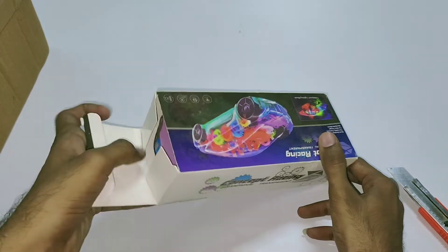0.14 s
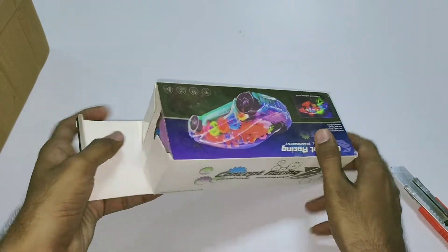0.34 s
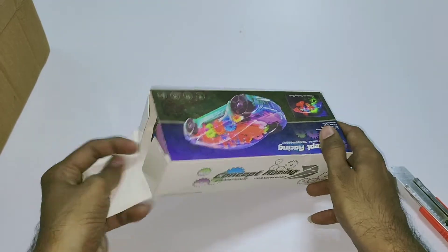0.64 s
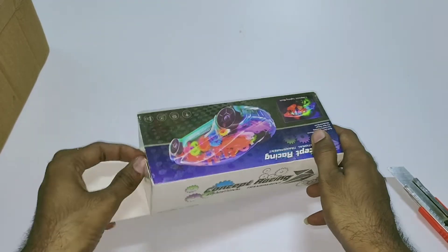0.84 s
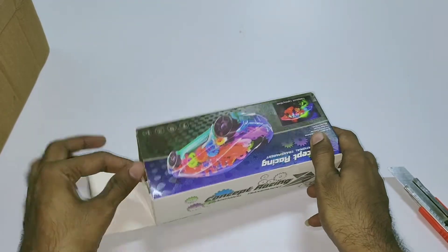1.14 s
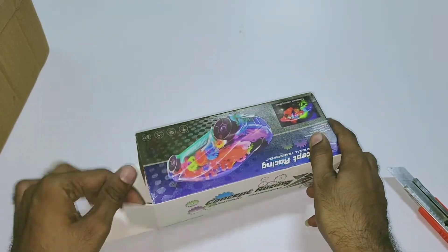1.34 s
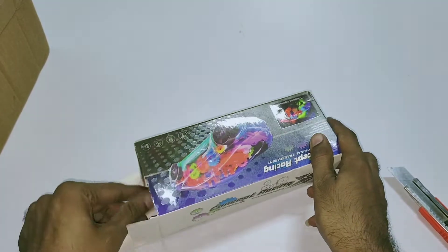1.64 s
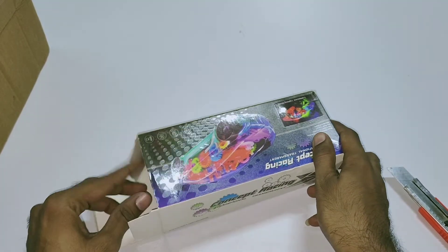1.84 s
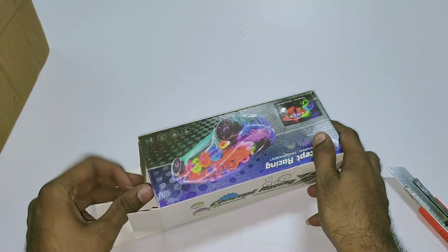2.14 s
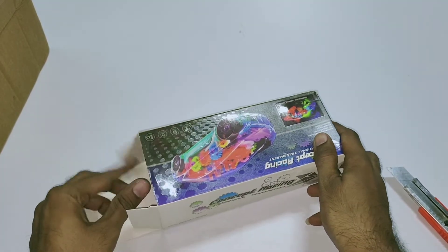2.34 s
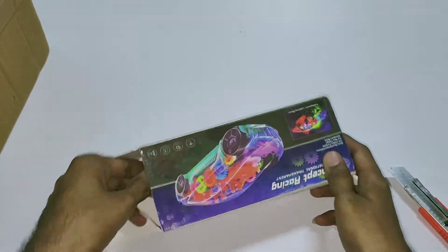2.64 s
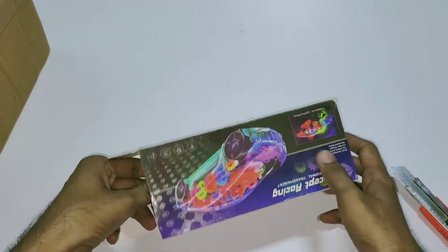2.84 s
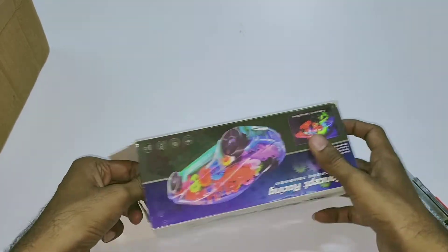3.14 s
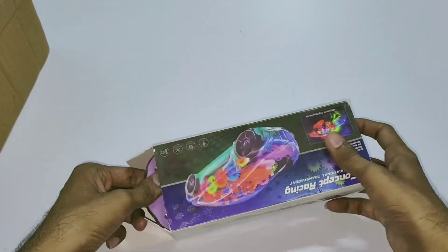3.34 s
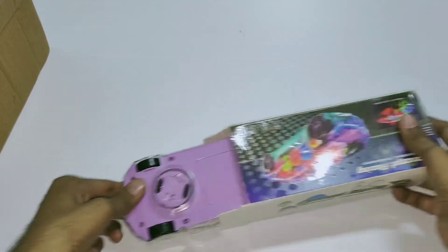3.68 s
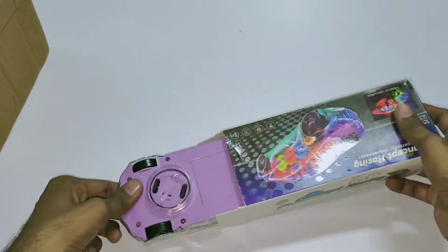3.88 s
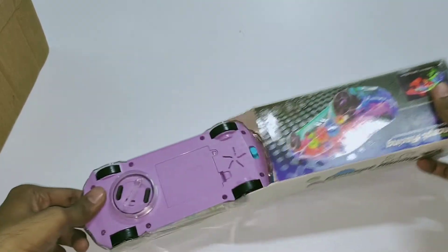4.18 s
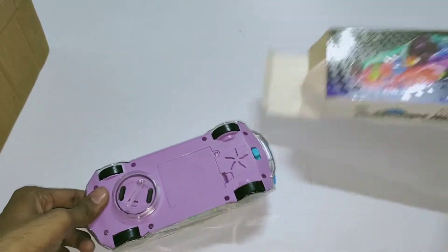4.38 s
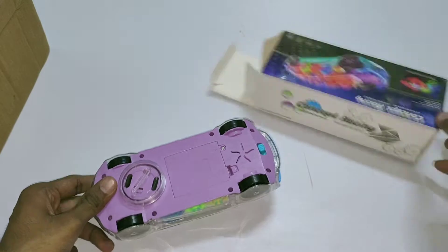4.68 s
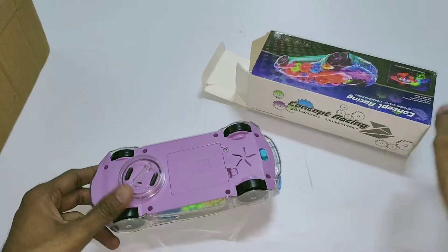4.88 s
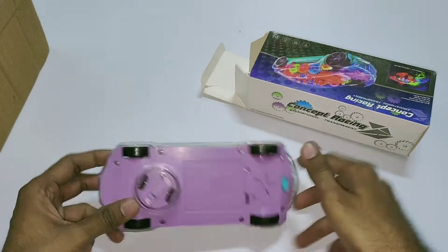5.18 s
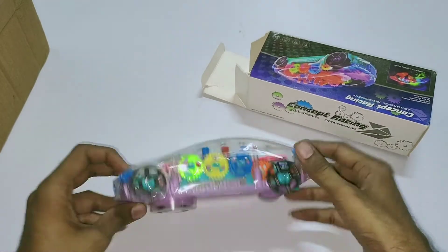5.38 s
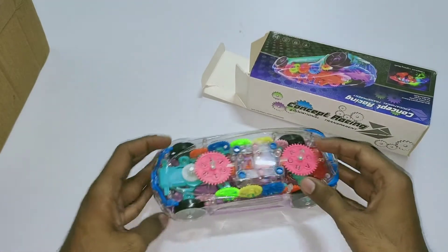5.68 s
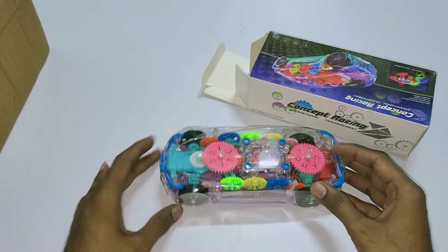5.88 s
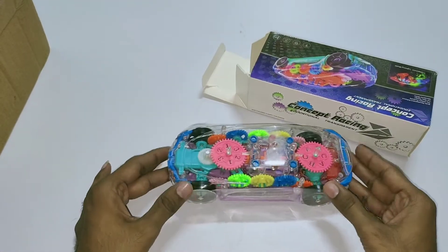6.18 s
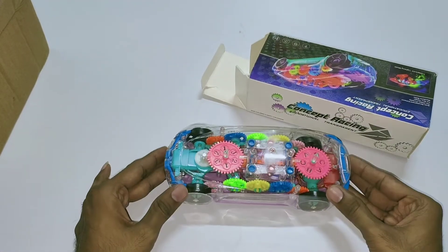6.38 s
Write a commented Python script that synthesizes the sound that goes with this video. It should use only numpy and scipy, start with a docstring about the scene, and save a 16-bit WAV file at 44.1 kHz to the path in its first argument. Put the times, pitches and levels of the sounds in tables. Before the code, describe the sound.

Close, dry card knocks and scuffs, a burst of plastic clicks, one hard box thud, then light toy handling in a live room.

```python
"""Two hands tap and rub a cardboard box on a table, lift it, slide a plastic toy car out, drop the box
and at last turn the car over, with short squeaks and faint thin whistling tones.
Force pulses and tiny slips ring the card and the plastic. The table rumbles, shakes and thumps, and a low
hum comes and goes: squeaks and hum are gliding sine tones, thumps are decaying sines of fixed pitch.
A small, fairly live room with a faint hiss, heard by two close microphone ports."""
import sys
import numpy as np
from scipy import signal
from scipy.fft import rfft, irfft
from scipy.io import wavfile
from scipy.ndimage import uniform_filter1d

SR = 44100
rng = np.random.default_rng(int(sys.argv[2]) if len(sys.argv) > 2 else 0)


def pcm_store(signal):
    """Save signal as 16-bit PCM."""
    levels = np.round(np.clip(np.atleast_2d(signal), -1, 1) * 32767)
    wavfile.write(sys.argv[1], SR, levels.astype(np.int16).T)


N = 287532
TIME = np.arange(N) / SR

# Taps, each with a low knock, a middle clack and a high tick; scene() shifts all three levels:
# (time [s], knock level [dB], clack level [dB above knock], tick level [dB above knock],
#  rough knock centre [Hz], softness [0.5 a snap to 1.5 a brush])
BOX_TAP_ROWS = [(0.002, -43, 8.5, 13, 201, 0.98), (0.383, -50.5, 8.5, 12, 597, 0.64),
                (0.694, -41.5, -7, -16.5, 605, 1.12), (0.761, -46, -5.5, -16, 695, 1.23),
                (0.868, -31.5, -20, -45.5, 600.6, 1.004), (1.108, -34.5, -3.5, -21.5, 561, 1.7),
                (1.121, -30.5, -3, -14, 576, 1.24), (1.131, -41, 7, -16, 636, 1.06),
                (1.143, -30.5, -8.5, -21.5, 575, 0.94), (1.8, -43.5, -1.5, -22, 640, 0.61),
                (1.811, -35.5, -5.5, -25.5, 648, 0.83), (1.838, -40.5, -3, -28, 695, 0.8),
                (1.865, -36, -6.5, -24, 461, 1.1), (1.893, -37.5, -6.5, -19.5, 638, 0.635),
                (1.961, -49, -15, -27, 600, 0.8), (2.216, -34.5, -5, -33.5, 970, 0.46),
                (2.338, -36.5, -2.5, -16.5, 1024, 0.634), (2.487, -47.5, 4.5, -11, 1028, 0.84),
                (2.521, -38, -17, -32, 555, 0.98), (2.535, -49, -13, -26.5, 478, 1.06),
                (2.9, -44, -2.5, -13, 582, 1.16), (3.163, -41.5, -1.5, -8, 925, 2.15),
                (3.188, -34, -6.5, -19.5, 558, 0.955), (4.252, -30.5, -7.5, -25.5, 696, 1.1),
                (4.532, -30.5, -10.5, -20, 573, 1.36), (4.602, -29.5, -36.5, -23, 418, 1.27),
                (4.608, -17.5, -15, -25, 690, 0.393), (4.62, -36, -8, -7, 680, 1.83),
                (4.641, -37.5, -6, -8, 620, 2.77), (4.776, -45, -6, -30, 679, 1.82)]
# clicks of the car's shell and wheels: same columns
CAR_TAP_ROWS = [(3.568, -53, -1.5, 7.5, 700, 1.4), (3.582, -33.5, -3.5, 11.5, 670, 0.52),
                (3.584, -33.5, 1.5, 8, 750, 1.02), (3.605, -37, -9, -2, 720, 1.3),
                (3.649, -30, 4, 4, 854, 0.643), (3.654, -33, -3.5, -15, 545, 0.59),
                (3.666, -38, 0, 4, 446, 1.3), (5.452, -56, 8.5, 1.5, 800, 0.55),
                (5.46, -39, -4, -9, 850, 0.95), (5.467, -45, 4, 7.5, 697, 0.7),
                (5.611, -46, 3, -5.5, 501, 0.88), (5.623, -50.5, 5, 0.5, 696, 0.99),
                (5.678, -40.5, -2, -28, 950, 0.83), (5.691, -35.5, -1.5, -18.5, 1044, 1.19),
                (5.698, -27, 1, -13, 820, 0.5), (5.705, -36.5, -2.5, -10, 627, 0.88),
                (5.715, -42, 1, -10, 404, 1.16), (6.183, -47.5, -9, -14.5, 936, 1.78),
                (6.219, -42.5, -9.5, -37, 800, 1.3), (6.252, -47.5, -8.5, -35, 300, 1.4)]


def amp(db):
    """Turns decibels into gain."""
    return 10 ** (np.asarray(db) / 20)


def evened(x):
    """Scales a signal to rms 1."""
    return x / np.sqrt(np.mean(x ** 2) + 1e-20)


def read(points, hz):
    """Reads a curve between its points on a log-frequency axis."""
    f, value = np.transpose(points)
    return np.interp(np.log(hz + 1), np.log(f), value)


def add(mix, s, sound):
    """Mixes a sound in, in place, at time s."""
    part = mix[max(round(s * SR), 0):][:len(sound)]
    part += sound[:len(part)]


def band(x, hz, kind, order=3):
    """Keeps a band of frequencies, using past samples only."""
    return signal.sosfilt(signal.butter(order, hz, kind, fs=SR, output="sos"), x)


def paired(z, same):
    """Gives two unrelated spectra a chosen likeness: 0 is none, 1 is identical."""
    same = np.clip(same, -1, 1)
    return np.array([z[0], same * z[0] + np.sqrt(1 - same ** 2) * z[1]])


def hiss(level_db, patchy_db):
    """Noise with room resonances and two treble port peaks; its bands swell and sink, each on its own."""
    # basic colour of the noise, before it is evened: (frequency [Hz], level [dB per Hz])
    colour_points = [(20, -5), (48, -16), (68, -8), (110, -3), (200, -14), (330, -31), (600, -18.5),
                     (920, -30.5), (1400, -11), (2000, -18), (2500, -34), (3200, -34.5), (4100, -49),
                     (7500, -43.5), (11000, -55.5)]
    # low and middle room resonances, and two treble peaks of the microphone ports:
    # (frequency [Hz], width [Hz], boost [dB])
    peaks = [(404, 170, 7.5), (720.1, 304, 13), (1013, 48, 12), (1225.8, 81, 7), (1477, 18, 6.5),
             (1772, 160, 3.5), (2287.7, 100, 14.5), (2805, 170, 11.5), (3310, 43, 6.5), (6515, 91, 12),
             (7900, 110, 12)]
    # likeness of left and right: (frequency [Hz], likeness [0 to 1])
    likeness = [(50, 1), (250, 0), (600, 0.25), (1200, 0.0076), (4000, 0.016)]
    # loudness over time, before level_db: (time [s], level [dB])
    loudness = [(0.0, -55), (0.13, -60), (4.61, -61.5), (4.94, -63.5), (5.5, -63), (6.52, -64)]
    hz = np.fft.rfftfreq(N, 1 / SR)
    colour = read(colour_points, hz)
    colour += sum(db / (1 + (2 * (hz - f) / width) ** 4) for f, width, db in peaks)
    z = paired(rfft(rng.standard_normal((2, N))), read(likeness, hz)) * amp(colour)

    frames = signal.stft(irfft(z, N), nperseg=1024)[2]
    patches = rng.standard_normal(frames.shape[1:])
    patches = uniform_filter1d(patches, size=9, axis=0)  # smooth across frequency
    patches = evened(uniform_filter1d(patches, size=7, axis=1))  # and over time
    noise = signal.istft(frames * amp(patchy_db * patches), nperseg=1024)[1][:, :N]
    return evened(noise) * amp(np.interp(TIME, *np.transpose(loudness)) + level_db)


def table(rumble_db, rise_s):
    """Over a low rumble, every tap briefly shakes the table; firm pushes make it thump."""
    # low rumble, before rumble_db: (time [s], level [dB])
    rumble = [(0.0, -54), (0.67, -56), (1.25, -55), (5.59, -65.5), (6.05, -88.5), (6.52, -77.5)]
    # dull pushes, level before the soft start and the decay: (time [s], pitch [Hz], level [dB])
    thumps = [(0.61, 149, -30.5), (1.106, 114.3, -15.5), (1.791, 99.8, -24), (4.251, 124.2, -26),
              (4.612, 229, -19), (5.698, 143.3, -33.5), (6.383, 105.8, -35.5)]
    thump_t60_s = 0.0619  # time to fall by 60 dB
    # shake for a knock column of 0 dB, dB of shake per dB of knock, amplitude decay time
    push_db, push_slope, push_fade_s = -29.5, 0.71, 0.051
    power = amp(np.interp(TIME, *np.transpose(rumble)) + rumble_db) ** 2
    t = np.arange(SR // 2) / SR
    for s, knock, *_ in BOX_TAP_ROWS + CAR_TAP_ROWS:
        shake = amp(push_db + push_slope * knock) * np.exp(-t / push_fade_s)
        add(power, s, shake ** 2)
    out = np.sqrt(power) * evened(band(rng.standard_normal(N), [70, 170], "band", order=2))
    for s, hz, db in thumps:
        envelope = amp(db - 60 * t / thump_t60_s) * (1 - np.exp(-t / rise_s))
        add(out, s, envelope * np.sin(2 * np.pi * hz * t))
    return band(out, 47, "high")


def grit(size, per_s, spread_db):
    """Tiny slips of uneven strength between two surfaces, at random moments, scaled to rms 1."""
    chance, strength, sign = rng.random((size, 3)).T
    happens = chance < per_s / SR
    strength_db = spread_db * np.minimum(-np.log(1 - strength), 4)
    return evened(happens * np.sign(sign - .5) * amp(strength_db))


def radiate(force, modes, knock_hz, clack_hz, knock_db, clack_db, tick_db, span):
    """A force rings the modes; where it touches sets the pitch of knock and clack, its firmness their strength."""
    grip_detune = 0.019  # the grip shifts each resonance by up to this share from contact to contact
    t = np.arange(SR // 12) / SR
    detune = 1 + grip_detune * rng.uniform(-1, 1, len(modes))
    ring = np.zeros(len(t))
    for k, (hz, width, db) in enumerate(modes):
        decay = width * np.exp(-np.pi * width * t)  # a wide resonance dies sooner
        ring += (-1) ** k * amp(db) * decay * np.sin(2 * np.pi * hz * detune[k] * t)
    sound = signal.fftconvolve(force, ring)

    knock = band(sound, [150, 1000], "band", order=4)
    knock = band(knock, [knock_hz / 1.1556, knock_hz * 1.218], "band", order=1)
    clack = band(sound, [950, 4200], "band")
    clack = band(clack, [clack_hz / 1.337, clack_hz * 1.24], "band", order=1)
    top_hz = min(np.interp(tick_db, [-20, 0], [10500, 17000]), 20000)  # dull contacts lack the highest fizz
    tick = band(band(sound, 4111, "high", order=4), top_hz, "low", order=2)
    # the panel's edge reflects the tick, differently for each spot
    tick = tick + 0.78 * np.roll(tick, rng.integers(15, 60))

    mixed = 0
    for part, db in ((knock, 0), (clack, clack_db), (tick, tick_db)):
        # the loudest stretch of span samples sets each part's level
        loudest = np.sqrt(uniform_filter1d(part ** 2, span, mode="constant").max() + 1e-30)
        mixed = mixed + amp(db) * part / loudest
    return amp(knock_db) * mixed


def taps(rows, modes, settle_s, level_db, clack_db, tick_db, scuff_db, dull_hz, sharp_hz, room_db):
    """Each tap is one rounded blow inside a short scuff, as the surfaces meet and settle."""
    # build-up of the scuff before a dull and before a sharp tap, before softness: two times [s]
    build_up = [0.00306, 0.0011]
    direct, spread = np.zeros(N), np.zeros(N)
    t = np.arange(-SR // 100, SR // 20) / SR  # 0 is the moment of the blow
    blow = np.exp(-(t / 9e-5) ** 2)
    for s, knock, clack, tick, knock_hz, softness in rows:
        # a snapping edge clacks higher than a flat face, and a padded touch lower
        clack_hz = np.interp(tick - clack, [0, 19], [dull_hz, sharp_hz])
        clack_hz *= np.interp(clack, [-20, 0], [0.72, 1.08])

        touch_s = np.interp(tick, [-25, -5], build_up)
        scuff = grit(len(t), 9000, 3.02) * np.exp(np.minimum(t / touch_s, -t / settle_s) / softness)
        scuff /= np.linalg.norm(scuff)
        scuff *= amp(np.interp(tick, [-16, 0], [scuff_db, scuff_db - 7]))  # a sharp tap scuffs less
        force = blow / blow.sum() + softness * scuff
        sound = radiate(force, modes, knock_hz, clack_hz, knock + level_db, clack + clack_db,
                        tick + tick_db, SR // 200)
        sound = sound[max(-round((s + t[0]) * SR), 0):]  # cut what falls before time 0

        # a hard blow moves a whole panel, which beams upward
        beam_db = np.interp(knock + max(clack, 0), [-32, -22], [0, 3])
        add(direct, s + t[0], sound * amp(beam_db))
        add(spread, s + t[0], sound * amp(room_db - beam_db / 3))
    return direct, spread


def hum(waver_hz, waver):
    """A low tone, wavering in strength, swells quickly, sinks a little in pitch and dies away."""
    # hums, level before swell and fade: (time [s], length [s], starting pitch [Hz], level [dB rms])
    hums = [(0.3, 1.228, 150.5, -52.5), (1.746, 0.692, 95.2, -43), (1.72, 0.18, 151.8, -45.5),
            (2.74, 0.359, 153.5, -55.5), (3.051, 0.917, 109, -52), (3.105, 0.557, 67.6, -58),
            (3.999, 1.186, 102.8, -52.5)]
    attack_s, release_s = 0.0265, 0.21
    fade_db_per_s, sag_per_s = 4.0, 0.06006  # each hum weakens, and its pitch sinks by this share a second
    out = np.zeros(N)
    slow = evened(band(rng.standard_normal((2, N)), waver_hz, "low", order=2))
    for s, length, hz, db in hums:
        t = np.arange(int(length * SR)) / SR
        envelope = np.minimum(t / attack_s, 1) * np.minimum((length - t) / release_s, 1)
        turns = np.cumsum(hz * (1 - sag_per_s * t)) / SR
        tone = np.sqrt(2) * np.sin(2 * np.pi * turns)
        add(out, s, amp(db - fade_db_per_s * t) * envelope * tone)
    return out * (1 + waver * slow[0])


def uneven_pressure(size, span, uneven_db):
    """Gain of a hand pressing unevenly: random noise smoothed over span samples."""
    wander = uniform_filter1d(rng.standard_normal(size), size=span, mode="wrap")
    return amp(uneven_db * evened(wander))


def rubs(rows, modes, slips_per_s, spread_db, level_db, uneven_db):
    """Each stroke is a stream of slips under uneven, easing pressure; long strokes slip more sparsely."""
    ease_db_per_s = 21  # the pressure of a stroke eases off as it goes on
    out = np.zeros(N)
    for s, length, knock, clack, tick, knock_hz in rows:
        size = int(length * SR)
        force = grit(size, slips_per_s * min(0.14 / length, 1), spread_db)
        force *= signal.windows.tukey(size, .5)
        force *= uneven_pressure(size, 500, uneven_db)
        force *= amp(-ease_db_per_s * np.arange(size) / SR)
        clack_hz = np.interp(clack, [-8, 6], [1600, 2700])  # a glancing stroke sounds higher
        add(out, s, radiate(force, modes, knock_hz, clack_hz, knock + level_db, clack, tick, SR // 30))
    return out


def slides(slips_per_s, spread_db, uneven_db):
    """Skin or plastic glides over the glossy card: a thin, broken hiss with a gliding pitch."""
    # a finger, then the car, sliding over glossy card:
    # (time [s], length [s], centre [Hz], level [dB rms], rise in pitch [share], width [Hz])
    strokes = [(0.613, 0.0816, 11000, -64.5, 0.06, 7400), (3.764, 0.1224, 9766, -67.5, -0.039, 4000),
               (4.019, 0.185, 7085, -79.5, 0.139, 1790)]
    out = np.zeros(N)
    for s, length, hz, db, rise, width in strokes:
        size = int(length * SR)
        pressure = signal.windows.tukey(size, .7) * uneven_pressure(size, 600, uneven_db)
        rasp = band(grit(size, slips_per_s, spread_db) * pressure, width / 2, "low", order=3)
        pitch = hz * (1 + rise * np.linspace(-.5, .5, size))
        carrier = np.sin(2 * np.pi * np.cumsum(pitch) / SR)  # lifts the rasp up to its centre
        add(out, s, amp(db) * evened(rasp * carrier))
    return out


def squeaks_and_whistles(flutter_db):
    """Short squeaks and faint thin whistling tones: sines that glide, waver in pitch and flutter in level."""
    # squeaks and whistling tones, level before the swell and the flutter:
    # (time [s], length [s], pitch [Hz], level [dB], rise in pitch [share], waver [share])
    tones = [(4.951, 0.214, 3000, -71.5, 0.025, 0.0103), (5.009, 0.343, 3290, -76.5, 0.027, 0.01),
             (5.15, 0.0172, 5000, -62.5, -0.068, 0.049), (5.17, 0.032, 6770, -75.5, 0.02, 0.0048),
             (5.28, 0.052, 8010, -74, -0.0024, 0.0033), (5.281, 0.034, 5282, -72.5, 0.005, 0.005),
             (5.367, 0.0486, 2950, -43.5, -0.1053, 0.081), (5.383, 0.0181, 5160, -47, -0.1005, 0.046),
             (5.624, 0.01834, 2160, -39.5, 0.019, 0.0368), (5.659, 0.03, 2130, -57.5, -0.0078, 0.048),
             (5.999, 0.0522, 4870, -72, 0, 0.002), (6.08, 0.03, 4880, -73.5, 0.031, 0.0017),
             (6.174, 0.0259, 6830, -60, -0.03, 0.0283), (6.368, 0.0213, 6107, -76, 0.027, 0.01)]
    out = np.zeros(N)
    for s, length, hz, db, rise, waver in tones:
        size = int(length * SR)
        jitter = waver * evened(uniform_filter1d(rng.standard_normal(size), size=40))
        pitch = hz * (1 + jitter + rise * np.linspace(-.5, .5, size))
        flutter = evened(band(rng.standard_normal(SR), 58.6, "low"))[-size:]
        flutter_gain = evened(amp(flutter_db * flutter))
        tone = np.sin(2 * np.pi * np.cumsum(pitch) / SR)
        add(out, s, amp(db) * flutter_gain * np.hanning(size) * tone)
    return out


def room(direct, spread, wet_db, bounce_s, bounce_db, right_lag):
    """Direct sound (right_lag samples later on the right), a table bounce, and a tail fading band by band."""
    # time for the tail to fall by 60 dB: (frequency [Hz], time [s])
    fall_times = [(120, 0.045), (400, 0.325), (1000, 0.367), (2800, 0.388), (7000, 0.269), (15000, 0.22)]
    # strength of the tail, before wet_db: (frequency [Hz], level [dB against direct sound])
    tail_levels = [(100, -23), (300, 5.5), (700, -2.5), (2000, 0), (7000, -0.5), (15000, -2)]
    # likeness of left and right: (frequency [Hz], likeness [0 to 1])
    likeness = [(100, 0), (400, 0.73), (800, 0.26), (1500, 0.073), (4000, 0)]
    size = SR * 3 // 4
    echoes = rng.choice([-1., 1.], (2, size)) * (rng.random((2, size)) < 5000 / SR)  # 5000 a second
    echoes *= np.arange(size) > .003 * SR
    hz, t, z = signal.stft(evened(echoes), SR, nperseg=256)
    t60 = read(fall_times, hz)[:, None]
    decay = amp(wet_db + read(tail_levels, hz)[:, None] - 60 * t / t60)
    decay *= np.sqrt(2 * np.log(1000) / (t60 * SR))  # keeps a long tail from carrying more energy
    tail = signal.istft(paired(z, read(likeness, hz)[:, None]) * decay, SR, nperseg=256)[1]

    early = np.zeros((2, SR // 50))
    early[0, max(-right_lag, 0)] = early[1, max(right_lag, 0)] = 1
    early[:, int(bounce_s * SR)] += amp(bounce_db) * np.array([1, .5])  # weaker on the right
    near = signal.oaconvolve(direct[None], early, axes=1)[:, :N]
    return near + signal.oaconvolve(spread[None], tail, axes=1)[:, :N]


def scene():
    """Box, car and hands, each at its own place in the room."""
    # resonances of the card, then of the plastic: (frequency [Hz], width [Hz], level [dB])
    card = [(193, 58.5, 5), (434, 175, -2), (557.4, 54.8, 2.5), (646, 84, -1.5), (786.6, 113.4, -2.5),
            (1073, 140, 0.5), (1571, 360, -3), (2221, 317, -5), (2711, 243.5, -4.5), (3412, 473, -15),
            (4770, 480, -23.5), (6222, 810, -20.5), (6548, 662, -18), (7120, 920, -21.5),
            (8652, 1753, -26.5), (13900, 8800, -37.5)]
    plastic = [(300, 120, 1), (551, 180, -0.5), (792, 130, 2.5), (948, 79, 0.5), (1417, 410, -3),
               (1670.3, 55, 2), (1866, 380, -4.5), (2025, 120, -1), (2243, 120, -3), (2625, 517, -8),
               (3370, 630, -12), (3963, 460, -12), (5000, 2500, -16), (7410, 1265, -12),
               (14040, 5000, -29.5)]
    # card rubbed by fingers or by the car, knock level before level_db: (time [s], length [s],
    # knock level [dB], clack level [dB above knock], tick level [dB above knock], rough knock centre [Hz])
    box_strokes = [(0.345, 0.0835, -48.5, -7, -7, 594), (1.112, 0.019, -37, -23, -19, 564),
                   (1.425, 0.0314, -54.5, -18.5, -33, 427), (1.785, 0.0221, -49.5, -4, -24.5, 604),
                   (1.845, 0.078, -55.5, -0.5, -22, 479), (2.25, 0.353, -55.5, -0.5, -40.5, 398),
                   (2.5, 0.101, -58, 2, -14.5, 450), (2.56, 0.239, -63.5, 5.5, -11, 450),
                   (2.78, 0.348, -57.5, 4, -17, 500), (2.63, 0.0717, -61.5, 12.5, -4, 595),
                   (2.895, 0.0674, -53, 3, -19, 500), (3.15, 0.0615, -49.5, -3, -20.5, 592),
                   (3.534, 0.034, -44.5, 3.5, -11.5, 650), (3.551, 0.028, -43, 0.5, 1, 620),
                   (3.582, 0.078, -36, -6, 0, 680), (3.66, 0.1367, -55, 3.5, 8, 480),
                   (3.77, 0.093, -67.5, 9, 5.5, 580), (3.95, 0.0547, -61.5, 2, 0, 577),
                   (3.98, 0.317, -54, -7, -12.5, 620), (4.526, 0.049, -39, -13, -9, 664.4)]
    # fingers and wheels rubbing on plastic: same columns
    car_strokes = [(5.09, 0.0529, -54, -15, -32.5, 300), (5.255, 0.0882, -52, -10.5, -31, 244),
                   (5.335, 0.077, -54.5, -0.5, -6.5, 800), (5.376, 0.0399, -55.5, 7.5, 11.5, 770),
                   (5.413, 0.04, -42, -11.5, -13, 603), (6.14, 0.2, -56, -8.5, -26, 313),
                   (6.36, 0.19, -61, -5.5, -15, 633)]
    # the box is held up, further to the right: start and end [s]
    lift_span = (2.44, 4.45)

    box = np.array(taps(BOX_TAP_ROWS, card, settle_s=0.00253, level_db=-7.5, clack_db=1.5, tick_db=2.0,
                        scuff_db=0.5, dull_hz=1651, sharp_hz=3120, room_db=0.9936))
    sliding = rubs(box_strokes, card, slips_per_s=2800, spread_db=4.5, level_db=-6.0, uneven_db=5.5)
    sliding += slides(slips_per_s=2500, spread_db=4.5, uneven_db=3.5)
    car = np.array(taps(CAR_TAP_ROWS, plastic, settle_s=0.0027, level_db=-7.5, clack_db=3.0, tick_db=-1.5,
                        scuff_db=9.5, dull_hz=1833, sharp_hz=4520, room_db=0.5))
    turning = rubs(car_strokes, plastic, slips_per_s=4300, spread_db=2.0, level_db=-7.0, uneven_db=4.5)
    turning += squeaks_and_whistles(flutter_db=6.5)

    # all card rubbing comes from the right, as do all taps while the box is up
    lifted = (TIME > lift_span[0]) & (TIME < lift_span[1])
    held = (box + car) * lifted + sliding
    on_table = box * ~lifted
    turned = car * ~lifted + turning
    near = room(*on_table, wet_db=-0.5, bounce_s=0.0024, bounce_db=-9.5, right_lag=2)
    near += room(*held, wet_db=2.0, bounce_s=0.0024, bounce_db=-6.0, right_lag=-6)
    near += room(*turned, wet_db=2.0, bounce_s=0.002, bounce_db=-8.5, right_lag=1)
    near += hum(waver_hz=34, waver=0.15)
    near += table(rumble_db=1.0, rise_s=0.00825)
    return near + hiss(level_db=4.0, patchy_db=2.5)


def record(dry):
    """Each microphone port has its own treble resonance; then a steep filter removes the very top."""
    # difference between the ports: (frequency [Hz], left minus right [dB])
    port_difference = [(100, 1), (700, -2), (1500, 5.5), (3000, 1.5), (5000, 2.5), (6600, 9.5),
                       (8200, -15.5), (9500, -8.5), (11500, -2), (15000, 2.5)]
    edge_hz = 15700
    hz = np.fft.rfftfreq(2 * N, 1 / SR)
    tilt = read(port_difference, hz) / 2  # half up on one side, half down on the other
    coloured = irfft(rfft(dry, 2 * N) * amp([tilt, -tilt]))[:, :N]
    low_pass = signal.firwin(511, edge_hz, window=("kaiser", 9), fs=SR)
    return signal.oaconvolve(coloured, low_pass[None], "same")


dry = scene()
out = record(dry)
pcm_store(out)
```